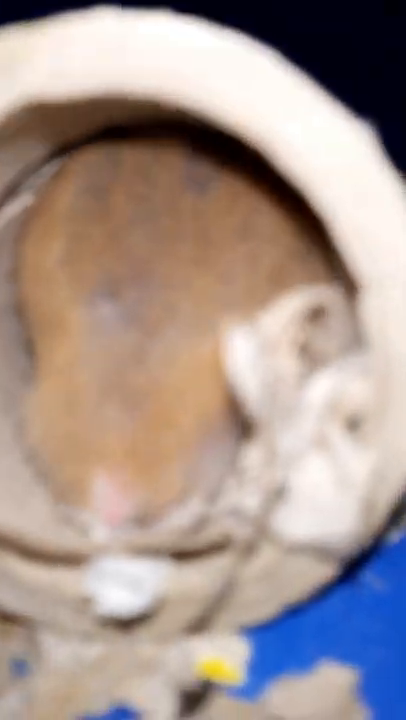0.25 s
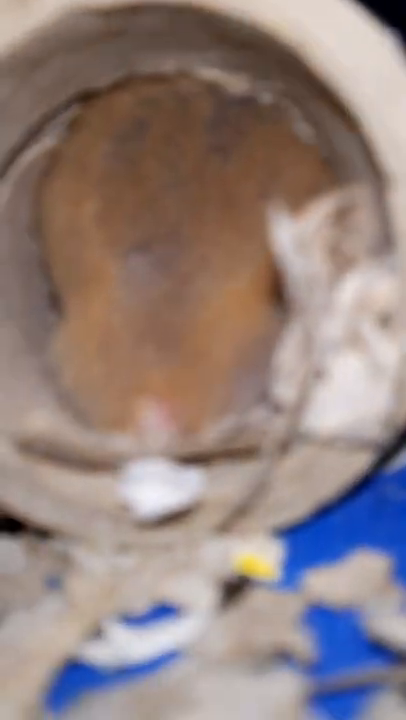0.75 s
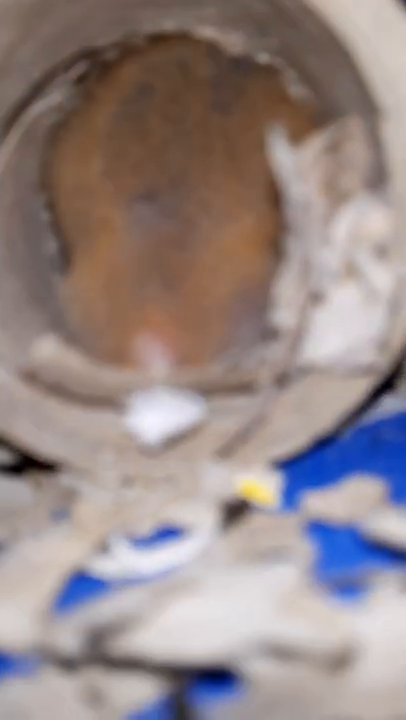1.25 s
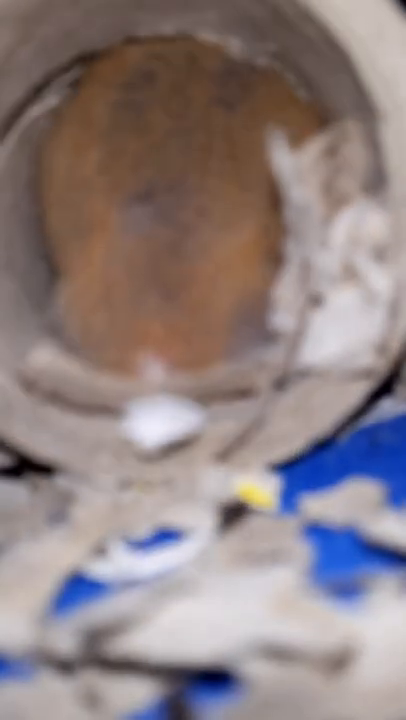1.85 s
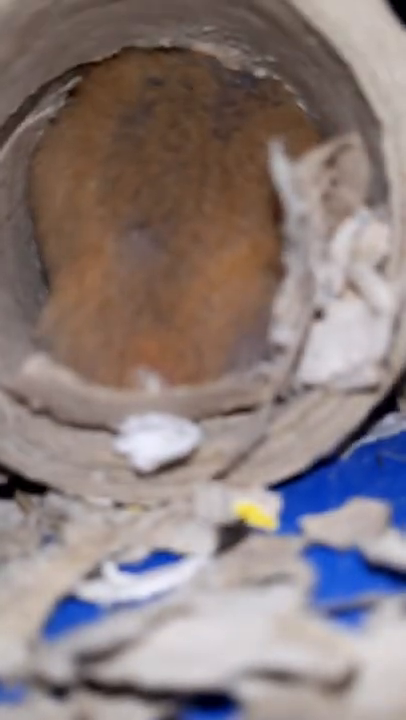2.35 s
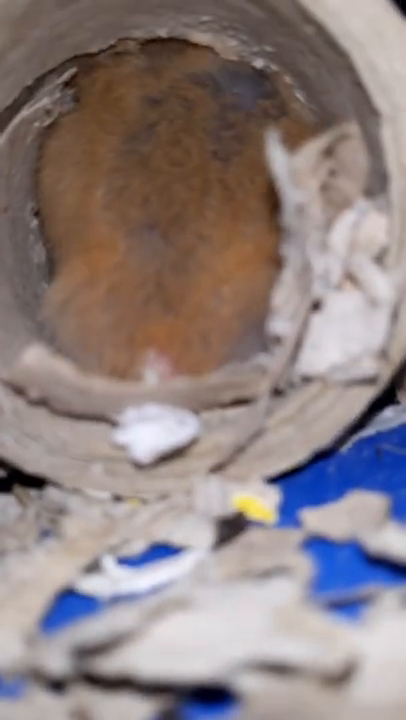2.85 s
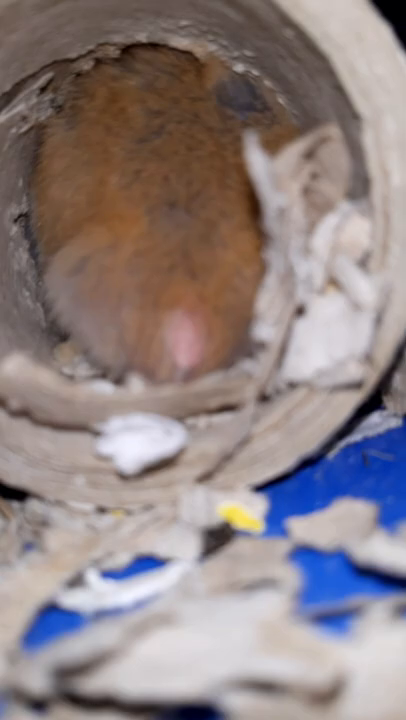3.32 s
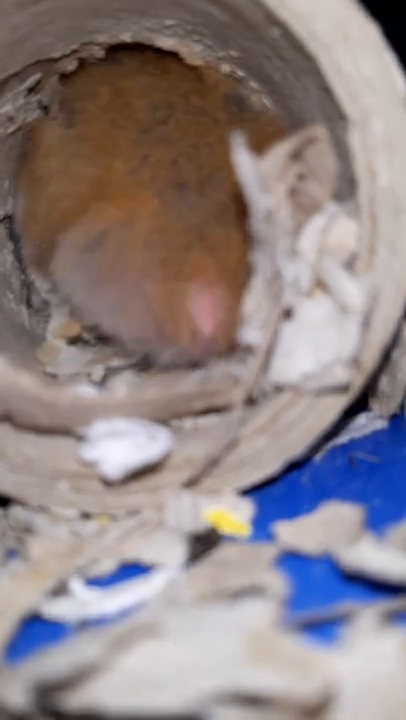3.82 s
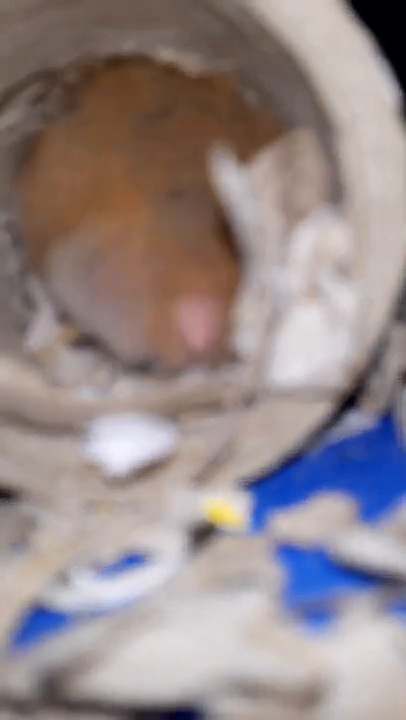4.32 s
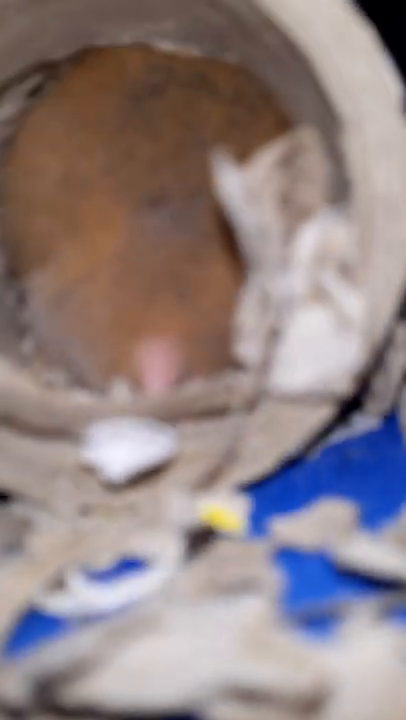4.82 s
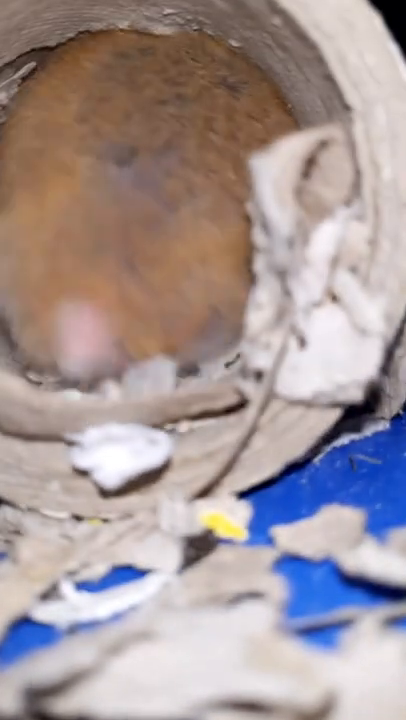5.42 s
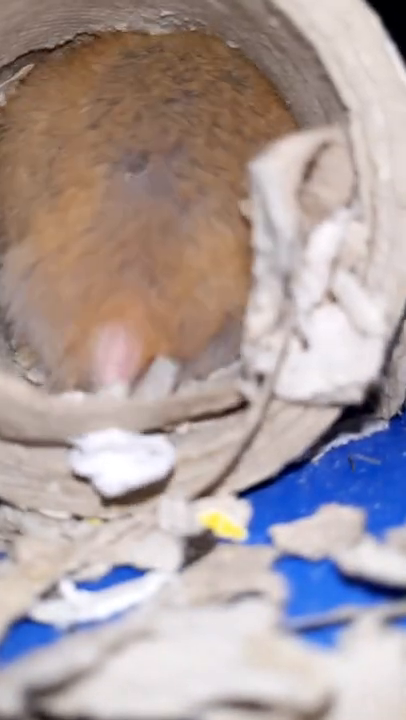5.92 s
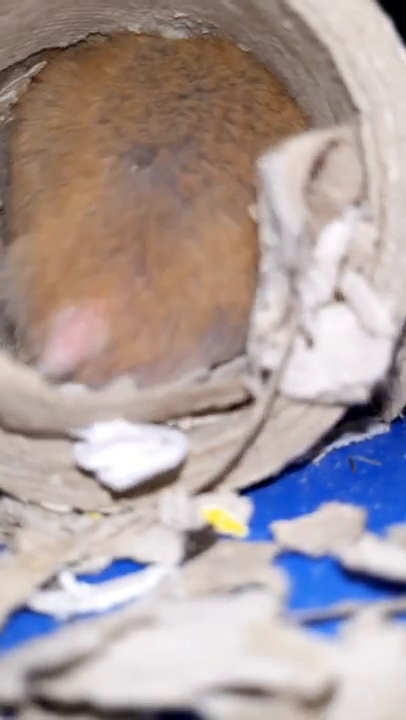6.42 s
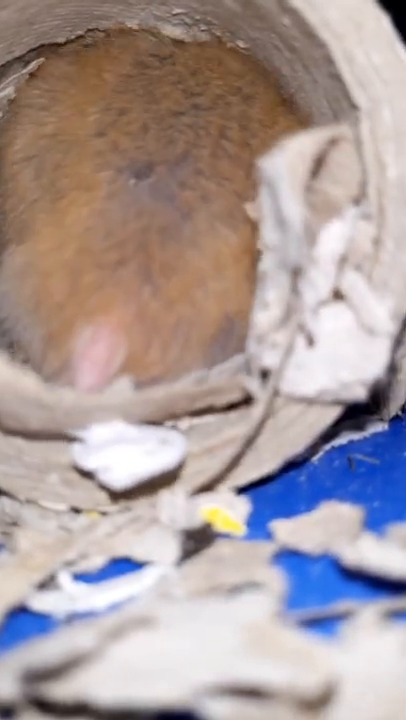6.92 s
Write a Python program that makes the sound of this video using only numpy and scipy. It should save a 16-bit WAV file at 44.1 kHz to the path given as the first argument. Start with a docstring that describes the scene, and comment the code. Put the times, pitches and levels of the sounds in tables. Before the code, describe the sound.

A hamster digs through dry shredded paper in a cardboard tube, close to a hand-held microphone. Each stroke crinkles the paper, scrapes the wall and gives a hollow thump. Early on, dull knocks land beside the microphone, followed by two light handling taps and a sharp click on the right. The digging carries on in bursts with short pauses, over the soft air and faint whine of a quiet room.

```python
"""A hamster digs in dry shredded paper inside a cardboard tube, close to a hand-held stereo microphone.
Over the air and faint whine of a quiet room, its strokes start at once: each crumples paper, drags claws
along the wall and thumps the tube, which answers with hollow modes. Dull knocks land beside the
microphone, loudest at 1.7 s; two light taps follow, then a sharp click at the right capsule at 2.9 s.
The digging goes on in bursts to the end, with a faint falling whistle behind it just after 5 s."""
import sys
import numpy as np
from scipy import signal
from scipy.fft import rfft, irfft
from scipy.io import wavfile
from scipy.ndimage import uniform_filter1d

SR = 44100
rng = np.random.default_rng(int(sys.argv[2]) if len(sys.argv) > 2 else 0)


def waveform_to_disk(signal):
    """Save audio, clipped to [-1, 1], as 16-bit WAV at the path in sys.argv[1]."""
    frames = np.transpose(np.atleast_2d(signal))
    scaled = np.clip(frames, -1, 1) * 32767
    samples = np.round(scaled).astype(np.int16)
    wavfile.write(sys.argv[1], SR, samples)


N = 315756
TIME = np.arange(N) / SR
RING = np.arange(8192) / SR  # time axis of one short response [s]

# how strongly the gap between body and wall rings as the animal turns: (time [s], gain [dB])
GAP_OPEN = [(0.6, -1), (2.2, -17), (3.4, -11), (4.2, -3.5), (5.2, 1), (6.0, -5.5), (6.7, -4)]


def digging():
    """Close up, paws push on the tube, scrape its wall and crumple paper, each a stream of tiny slips."""
    push_db, scrape_db, paper_db = map(effort, range(3))
    push = grains(thump, push_db, per_s=700, spread_db=1.0, clump_db=1.92, spots=8)
    # a harder push adds little weight, so the floor levels off
    weight_db = np.minimum(push_db - 5.0, 0.38 * push_db - 39.5)
    weight = grains(sway, weight_db, per_s=440, spread_db=6.0, clump_db=-1.0, spots=4)
    scrape = grains(clack, scrape_db, per_s=1100, spread_db=1.5, clump_db=2.44, spots=10)
    gap_db = (scrape_db + paper_db) / 2 + curve(GAP_OPEN, TIME)
    gap = grains(rasp, gap_db, per_s=1200, spread_db=5.5, clump_db=1.5, spots=6)
    paper = grains(snap, paper_db, per_s=1600, spread_db=3.5, clump_db=2.5, spots=14)
    # now and then a stiff shred snaps on its own
    crackle = grains(snap, paper_db - 5.5, per_s=64, spread_db=6.5, clump_db=1.5, spots=6)
    return push + weight + scrape + gap + paper + crackle


def effort(part, crest=0.45, slack_db=13.5, onset_s=0.0095, settle_s=(0.013, 0.017, 0.037),
           fidget_mix_db=(0.5, -4.5, -2)):
    """Level in dB of push (0), scrape (1) or paper (2): strokes swell, crest and settle over a rustle."""
    # digging strokes at their crest: (start [s], length [s], push [dB], scrape [dB], paper [dB])
    strokes = [ (0.394, 0.046, -49, -52, -61.5), (.513, 0.044, -41, -77, -64.5),
               (0.54, 0.1, -45, -52.5, -54), (0.609, 0.063, -40.5, -45, -60),
               (0.719, .045, -46.5, -75, -77), (0.771, 0.075, -40, -46, -54.5),
               (0.924, 0.028, -44.5, -44.5, -50.5), (1.118, 0.087, -79, -66.5, -64.5),
               (1.228, 0.14, -95, -76, -67), (1.345, 0.059, -50, -59, -53), (1.865, 0.032, -47, -62.5, -67),
               (1.957, 0.12, -52, -60.5, -59), (2.104, 0.087, -43, -50, -51),
               (2.263, 0.074, -38, -45.5, -46), (2.474, 0.11, -47, -55, -60),
               (2.69, 0.063, -53.5, -76, -72), (2.741, 0.11, -48, -59.5, -56), (2.916, 0.1, -47, -55, -58),
               (3.116, 0.09, -42.5, -56.5, -60), (3.323, .07, -42, -62, -63.5),
               (3.367, 0.067, -42, -50, -50.5), (3.437, 0.074, -49.5, -59, -68),
               (3.595, 0.06, -51, -73, -89), (3.66, 0.052, -49.5, -60.5, -58.5),
               (3.696, 0.037, -48, -53, -57.5), (3.851, 0.14, -66, -63.5, -61),
               (3.962, 0.051, -67, -61.5, -80), (4.076, 0.064, -48, -57.5, -67.5),
               (4.155, 0.029, -43, -42.5, -47.5), (4.18, 0.028, -58, -50.5, -59),
               (4.189, 0.11, -56, -60.5, -62), (4.266, 0.11, -51, -83, -67), (4.468, 0.14, -62, -64, -62),
               (4.701, 0.054, -67.5, -78.5, -68), (4.859, 0.15, -61.5, -78, -84),
               (5.129, 0.11, -50.5, -50.5, -53), (5.174, 0.069, -42, -54, -60),
               (5.367, 0.092, -58, -63.5, -76), (5.441, 0.081, -52.5, -68.5, -70),
               (5.69, 0.069, -62.5, -72, -87), (5.735, 0.18, -56.5, -64.5, -61.5),
               (5.947, 0.051, -55.5, -66, -86), (6.031, 0.012, -60, -53, -52),
               (6.061, 0.047, -43.5, -52, -50), (6.27, 0.045, -54, -73, -65),
               (6.312, 0.13, -51.5, -61.5, -59), (6.705, 0.066, -58, -58, -64.5),
               (6.806, 0.054, -62, -79, -75), (6.892, 0.045, -53, -63.5, -63.5),
               (7.086, 0.09, -57, -63.5, -62)]
    # faint rustle of the animal fidgeting between strokes: (time [s], level [dB])
    fidget = [(.3, -85), (.6, -84), (1.05, -79), (1.5, -77.5), (1.85, -80.5), (2.25, -68), (2.45, -77),
              (2.85, -62), (3.3, -68), (3.6, -69), (4.2, -69.5), (4.55, -76), (4.82, -91), (5.1, -67.5),
              (5.62, -79), (6.15, -68.5), (6.5, -68), (6.75, -76.5), (7.15, -72)]
    power = amp(curve(fidget, TIME, left=-110) + fidget_mix_db[part]) ** 2
    for start, length, *levels in strokes:
        near = slice(max(round((start - .05) * SR), 0), round((start + length + .2) * SR))
        t = TIME[near] - start
        slack = np.interp(t / length, [0, crest, 1], [1, 0, 1]) ** 2  # 0 where the paw presses hardest
        edges = np.exp(np.minimum(t, 0) / onset_s - np.maximum(t - length, 0) / settle_s[part])
        power[near] += (amp(levels[part] - slack_db * slack) * edges) ** 2
    return 10 * np.log10(power)


def grains(response, level_db, per_s, spread_db, clump_db, spots):
    """Random slips of uneven size follow a level curve in clumps; each spot has its own response."""
    size = amp(spread_db * np.minimum(rng.exponential(1, N), 4)) * rng.choice([-1, 1], N)
    slips = evened(size * (rng.random(N) < per_s / SR))
    # the energy of a stroke is shared out among the slips that fall in it
    slips /= np.sqrt(abs(uniform_filter1d(slips ** 2, size=1500)) + 0.14)
    clumps = evened(cut(cut(rng.standard_normal(N), 42, "low"), 13.5, "high"))
    slips *= amp(level_db + clump_db * clumps)
    # the paws work on a few neighbouring spots, then move on
    spot = ((TIME * 14).astype(int) + rng.integers(0, 4, N)) % spots
    return sum(excite(response(), slips * (spot == k)) for k in range(spots))


def strikes(gap_db=-7.5, rms_samples=441):
    """A paw lands: the tube thumps, claws clack and ring the gap, paper snaps; steps move the floor."""
    # paws striking the tube: (time [s], thump [dB], claw clack [dB], paper snap [dB])
    landings = [ (0.364, -40.5, -69, -78), (0.404, -35.5, -46, -56.5), (.513, -43, -72, -75),
                (.578, -34, -29.5, -38), (0.629, -22.5, -27, -50), (.815, -52, -40.5, -51.5),
                (0.836, -33.5, -68, -63), (.916, -31.5, -52, -64), (1.845, -46.5, -80, -73),
                (1.956, -43, -75, -83), (2.008, -65, -51.5, -53), (2.024, -33.5, -43, -51),
                (2.083, -42, -63, -63), (2.126, -52, -46, -53.5), (2.272, -39, -38.5, -46.5),
                (2.29, -27.5, -33, -41), (2.492, -31.5, -48.5, -52.5), (2.51, -37, -40.5, -53.5),
                (2.983, -67, -48, -49), (3.147, -39, -46, -48), (3.208, -64, -59, -52.5),
                (3.256, -60, -81, -62), (3.322, -42, -75, -67), (3.387, -44, -41, -41.5),
                (3.403, -38, -55, -49), (3.454, -51, -61, -54.5), (3.669, -51, -56, -58.5),
                (3.728, -44.5, -40, -53), (3.877, -51.5, -51.5, -64), (4.161, -67, -39.5, -45.5),
                (4.258, -69, -54, -72), (4.553, -61, -50.5, -49.5), (5.467, -45, -59, -65),
                (5.6, -58, -61.5, -86), (5.668, -51.5, -91, -90), (5.713, -49.5, -64, -62),
                (6.027, -48, -54.5, -55.5), (6.082, -41.5, -52.5, -54), (6.348, -44.5, -61, -59),
                (6.709, -37, -38.5, -51.5), (6.887, -39, -49, -51)]
    # the animal's weight dropping on the cage floor: (time [s], level [dB])
    steps = [(0.763, -49), (0.919, -45.5), (2.087, -45.5), (3.336, -47.5), (4.29, -48), (4.332, -52),
             (6.715, -45.5), (6.888, -42)]
    out = np.zeros((2, N))
    for s, thump_db, clack_db, snap_db in landings:
        crunch_db = -15.5 + 0.88 * max(clack_db + 36.5, 0)  # the hardest clacks crunch more
        add(out, s, amp(thump_db) * skid(thump, step_s=0.00389, toes=3))
        claws = skid(lambda: clack(crunch_db, crunch_decay_s=0.0066), step_s=0.0021, toes=4)
        add(out, s, amp(clack_db) * claws)
        add(out, s, amp(clack_db + gap_db + curve(GAP_OPEN, s)) * rasp())
        add(out, s, amp(snap_db) * skid(snap, step_s=0.0013, toes=3))
    for s, db in steps:
        add(out, s, amp(db) * sway())
    return out * np.sqrt(rms_samples)  # from unit energy to unit rms over that span


def skid(response, step_s, toes, fade_db=-2):
    """Toes touch in quick succession, each at its own spot and softer than the last."""
    out = np.zeros((2, len(RING)))
    for k in range(toes):
        add(out, k * step_s * rng.uniform(0.741, 1.25), amp(k * fade_db) * response())
    return unit(out)


def tube(vary_db=6.5, apart_hz=1300, shift=0.019, build_s=0.0013):
    """The tube struck at a random spot; the moving body shifts its modes."""
    # modes of the tube with the animal in it: (frequency [Hz], level [dB], t60 [s])
    modes = [(148.7, -14.5, 0.23), (207, -5, 0.067), (243.5, -13, 0.094), (276.1, 1, 0.07),
             (280, -25, 0.053), (367, -6, 0.031), (458, -0.5, 0.017), (596, -5, 0.04), (939, -7, 0.061),
             (1096, 12.5, 0.038), (1121, -21, 0.06), (1223, -9.5, 0.1), (1700, -24.5, 0.018),
             (1964, -13, 0.031), (2160, -8.5, 0.011), (2698, -15, 0.079), (2907, -2, 0.025),
             (3284, -1.5, 0.015), (3520, -12, 0.025), (4850, 6, 0.016)]
    hz = np.transpose(modes)[0][:, None]
    weight, drift = rng.standard_normal((2, len(modes), 1))
    # higher modes reach the two capsules further apart in phase
    side = rng.choice([-1, 1], (len(modes), 1))
    apart = side * np.minimum(hz / apart_hz, np.pi / 2)
    phase = np.array([apart, -apart]) / 2
    ringing = ring(modes, phase, vary_db * weight, detune=1 + shift * np.clip(drift, -2, 2))
    # the air in the tube takes a moment to start ringing, so the blow sounds hollow
    return ringing * (1 - np.exp(-RING / build_s))


def thump(soft_hz=440, lowest_hz=165):
    """A soft paw reaches only the tube's low modes."""
    low_modes = cut(tube(vary_db=-1.9), soft_hz, "low", order=4)
    return unit(cut(low_modes, lowest_hz, "high")) * pan(3.8)


def clack(crunch_db=-14, crunch_decay_s=0.03, hard_hz=480, top_hz=3000):
    """A hard claw reaches the tube's upper modes, with a short crunch of cardboard."""
    crunch = cut(burst(), 1500, "low", order=1) * np.exp(-RING / crunch_decay_s)
    crunch = cut(cut(crunch, 310, "high"), 5500, "low")
    upper_modes = cut(cut(tube(), hard_hz, "high", order=3), top_hz, "low", order=4)
    return unit(unit(upper_modes) + amp(crunch_db) * unit(crunch)) * pan(5.0)


def snap(decay_s=0.0013, echo_db=-17, echo_decay_s=0.0088, colour_db=3.5):
    """A paper fibre gives way: a tiny burst of its own colour, scattered by the tube to each capsule."""
    # spectrum of the dry paper: (frequency [Hz], relative density [dB])
    paper = [(1760, 6.5), (3000, -14), (3220, 0.5), (4290, -6.5), (5750, -1.5), (6300, 1.5), (8460, 4.5),
             (10100, -1.5), (11600, -20), (14800, -5.5), (16000, -51.5)]
    envelope = np.exp(-RING / decay_s) + amp(echo_db) * np.exp(-RING / echo_decay_s)
    hz = np.fft.rfftfreq(len(RING), 1 / SR)
    colour = np.interp(hz, np.arange(0, SR / 2, 700), rng.standard_normal(32))
    fizz = irfft(rfft(burst()) * amp(read(paper, hz) + colour_db * colour))
    return unit(cut(fizz * envelope, 4000, "high", order=3))


def rasp():
    """A slip rings the narrow gap between body and wall, in unrelated phase at the two capsules."""
    # modes of the gap: (frequency [Hz], level [dB], t60 [s])
    modes = [(2586, -5.5, 0.022), (2844, 2.5, 0.021), (2960, -4, 0.01), (3240, -14, 0.027)]
    phase = rng.uniform(0, 2 * np.pi, (2, len(modes), 1))
    detune = 1 + 0.041 * rng.standard_normal((len(modes), 1))
    return unit(cut(ring(modes, phase, detune=detune), 1500, "high"))


def sway():
    """The cage floor under the tube gives with a shift of weight."""
    # modes of the floor: (frequency [Hz], level [dB], t60 [s])
    modes = [(89.7, -5.5, 0.18), (117.5, 16, 0.065), (133, 0.5, 0.085)]
    detune = 1 + 0.062 * rng.standard_normal((len(modes), 1))
    return unit(pan(7.3) * cut(ring(modes, detune=detune), 190, "low", order=3))


def knocks(scuff_db=-31, scuff_decay_s=0.03):
    """Soft blows beside the microphone scuff what they hit and ring its modes."""
    # dull knocks: (time [s], level [dB], brightness cutoff [Hz])
    blows = [(1.161, -55.5, 3500), (1.203, -61, 700), (1.65, -50.5, 800), (1.6746, -28.5, 1010),
             (1.678, -19, 600), (1.705, -31.5, 760), (1.737, -49, 607)]
    # modes of the knocked object: (frequency before detuning [Hz], level [dB], t60 [s])
    modes = [(331.8, -2, 0.11), (483, 9.5, 0.0098), (633, -17, 0.2), (856, -12, 0.051), (1320, -13, 0.054),
             (1950, -9, 0.017), (3500, -0.5, 0.0047)]
    ringing = ring(modes, phase=-np.pi / 2)
    out = np.zeros((2, N))
    for s, db, bright_hz in blows:
        scuff = evened(cut(burst(), 1000, "low", order=1)) * np.exp(-RING / scuff_decay_s)
        knock = cut(ringing, bright_hz, "low") + amp(scuff_db) * scuff
        add(out, s, amp(db) * pan(1.5) * cut(knock, 280, "high"))
    return out


def taps(rattle_db=-5, rattle_decay_s=0.018):
    """Handling noise: light taps make the microphone's housing ring and rattle briefly."""
    # taps on the housing: (time [s], level [dB])
    touches = [(2.6113, -42.5), (2.834, -40)]
    # modes of the tapped housing: (frequency before detuning [Hz], level [dB], t60 [s])
    modes = [(685, -5.5, 0.12), (948, 4, 0.046), (1180, -4, .02), (1550, -36, 0.044)]
    out = np.zeros((2, N))
    for s, db in touches:
        rattle = evened(cut(cut(burst(), 510, "high"), 1400, "low", order=4))
        tap = pan(6.7) * ring(modes) + amp(rattle_db) * rattle * np.exp(-RING / rattle_decay_s)
        add(out, s, amp(db) * cut(tap, 1450, "low", order=4))
    return out


def clicks(width_s=0.00042, tick_db=-14, tick_decay_s=0.00082):
    """A push and a pull of pressure at the right capsule; the casing rings faintly in both channels."""
    # two small clicks just ahead of the sharp one: (time [s], level [dB])
    hits = [(2.8857, -26), (2.887, -18.5), (2.9058, 0.5)]
    # modes of the casing: (frequency before detuning [Hz], level [dB], t60 [s])
    modes = [(274, -28.5, 0.17), (627, -37, 0.09), (950, -20, 0.076), (1236, -13.5, 0.042)]
    push_pull = (1 - RING / width_s) * np.exp(-RING / width_s)
    pulse = cut(cut(push_pull, 2700, "low"), 200, "high") * amp(0.5)
    casing = amp(-18.5) * cut(ring(modes), 1700, "low")
    out = np.zeros((2, N))
    for s, db in hits:
        tick = amp(tick_db) * np.exp(-RING / tick_decay_s) * cut(burst(), 10000, "low")
        add(out, s, amp(db) * (amp([[-27], [0]]) * pulse + amp([[-11], [0]]) * tick + casing))
    return out


def enclosure(x, t60=0.22, wet_db=-21):
    """Adds faint reflections from the cage and the room, 4 ms behind the direct sound."""
    tail = burst() * np.exp(-np.log(1000) * RING / t60) * (RING > .004)
    return x + amp(wet_db) * excite(unit(tail), x.mean(0))


def whistles():
    """In the background, two faint narrow bands of noise glide in pitch and level."""
    # a brief falling whistle: (time [s], frequency [Hz], level [dB])
    whistle = [(5.2, 2740, -69), (5.279, 2614, -71.5), (5.42, 2510, -75), (5.53, 2400, -74),
               (5.6, 2480, -94)]
    # a whine that wanders throughout: (time [s], frequency [Hz], level [dB])
    whine = [(0, 927, -78), (.35, 979, -74), (1.4, 1000, -87.5), (2.6, 1057, -68), (3.3, 986, -67),
             (4.4, 935, -78), (4.9, 965, -82.5), (5.7, 1099, -75.5), (6.35, 1047, -68.5), (6.65, 952, -72),
             (7.16, 923, -73)]
    out = np.zeros((2, N))
    for glide, half_width_hz in (whistle, 130), (whine, 14):
        s, hz, db = np.transpose(glide)
        carrier = np.exp(2j * np.pi * np.cumsum(np.interp(TIME, s, hz)) / SR)
        blur = cut(rng.standard_normal((2, N)) + 1j * rng.standard_normal((2, N)), half_width_hz, "low")
        out += evened((blur * carrier).real) * amp(np.interp(TIME, s, db, left=-150, right=-150))
    return out


def room(air_top_hz=1600, hiss_db=-69, hiss_extra_db=6.5, hiss_sink_s=0.2):
    """Room tone: slowly swelling air, partly shared between the capsules, under microphone hiss."""
    # spectrum of air and hiss together: (frequency [Hz], relative density [dB])
    spectrum = [(30, -30), (70, -6), (141, 0.5), (290, -5), (540, -12.5), (684, -9), (844, -11), (937, -4),
                (1150, -10.5), (1450, -17.5), (4780, -26), (8300, -17.5), (11400, -25), (16000, -24.5)]
    # likeness of left and right: (frequency [Hz], correlation [0 to 1])
    likeness = [(60, .5), (300, .4), (700, .3), (1400, .1), (3000, 0)]
    # the air noise swells and sinks: (time [s], level [dB])
    swell = [(0, -70), (1.0, -71), (1.9, -65.5), (2.6, -62.5), (3.3, -60), (3.7, -71), (4.1, -63),
             (4.7, -71), (5.7, -71), (6.05, -66), (6.4, -68), (7.16, -64.5)]
    hz = np.fft.rfftfreq(N, 1 / SR)
    left, unrelated = rfft(rng.standard_normal((2, N)))
    alike = read(likeness, hz)
    right = alike * left + np.sqrt(1 - alike ** 2) * unrelated
    noise = evened(irfft(np.array([left, right]) * amp(read(spectrum, hz)), N))
    air = irfft(rfft(noise) / (1 + (hz / air_top_hz) ** 4), N)
    hiss = (noise - air) * amp(hiss_db + hiss_extra_db * np.exp(-(TIME / hiss_sink_s) ** 2))
    return air * amp(curve(swell, TIME)) * pan(2.3) + hiss * pan(0.34)


def ring(modes, phase=0., gain_db=0., detune=0.97):
    """Sum of dying modes, each frequency multiplied by detune."""
    hz, db, t60 = np.transpose(modes)[:, :, None]
    waves = np.cos(2 * np.pi * hz * detune * RING + phase)
    return np.sum(amp(db + gain_db) * np.exp(-np.log(1000) * RING / t60) * waves, axis=-2)


def burst():
    """Stereo white noise, one response long."""
    return rng.standard_normal((2, len(RING)))


def excite(response, drive):
    """Plays a mono signal through a stereo response."""
    return signal.oaconvolve(drive[None], response, axes=1)[:, :N]


def amp(db):
    """Decibels to gain."""
    return 10 ** (np.asarray(db) / 20)


def evened(x):
    """Scales to rms 1."""
    return x / np.sqrt(np.mean(x ** 2) + 1e-20)


def unit(x):
    """Scales a stereo response to a mean energy of 1 per channel."""
    return x / np.sqrt(np.sum(x ** 2) / 2 + 1e-20)


def curve(points, s, left=None):
    """Reads a level curve at time s."""
    return np.interp(s, *np.transpose(points), left=left)


def read(points, hz):
    """Reads a spectrum on a log-frequency axis."""
    f, value = np.transpose(points)
    return np.interp(np.log(hz + 1), np.log(f + 1), value)


def add(mix, s, sound):
    """Mixes a stereo sound in at time s."""
    part = mix[:, round(s * SR):][:, :sound.shape[1]]
    part += sound[:, :part.shape[1]]


def cut(x, hz, kind, order=2):
    """Low-pass or high-pass."""
    return signal.sosfilt(signal.butter(order, hz, kind, fs=SR, output="sos"), x)


def pan(left_db):
    """Channel gains that put the left left_db above the right."""
    return amp([[left_db / 2], [-left_db / 2]])


def scene():
    """The close sounds with their reflections, the dry clicks at the capsule, and the room behind."""
    background = whistles() + room()
    return enclosure(digging() + strikes() + knocks() + taps()) + clicks() + background


def record(dry, bass_hz=58, edge_hz=15900):
    """The microphone sheds deep bass and the highest treble."""
    thin = cut(dry, bass_hz, "high", order=3)
    band_limit = signal.firwin(301, edge_hz, window=("kaiser", 8), fs=SR)
    return signal.oaconvolve(thin, band_limit[None], "same")


dry = scene()
out = record(dry)
waveform_to_disk(out)
```